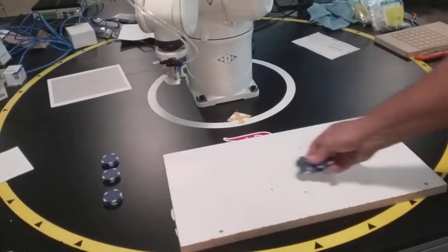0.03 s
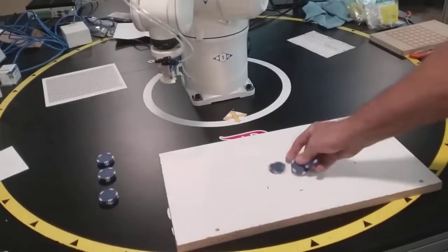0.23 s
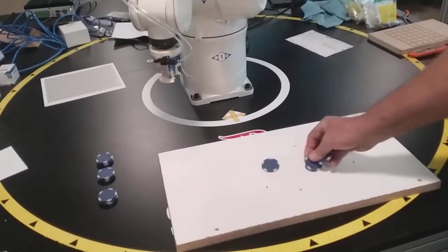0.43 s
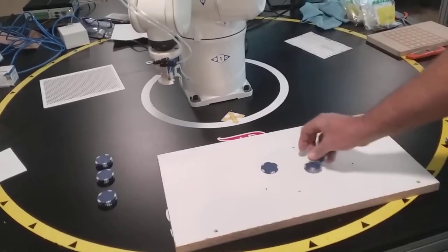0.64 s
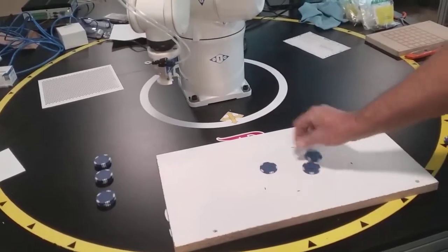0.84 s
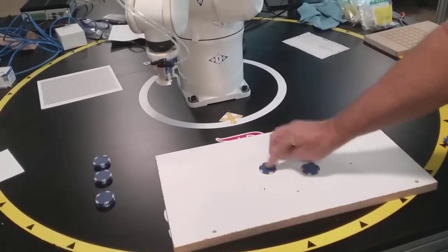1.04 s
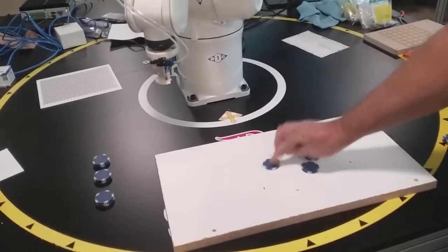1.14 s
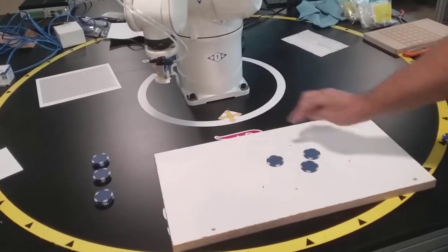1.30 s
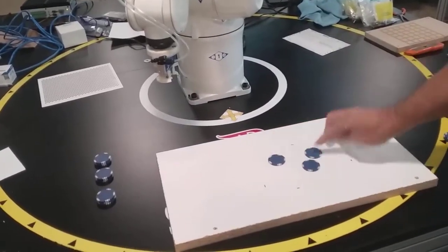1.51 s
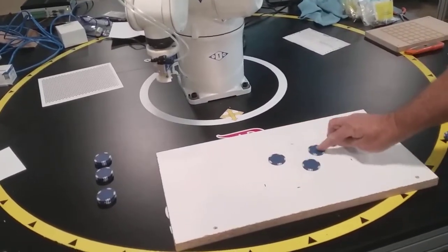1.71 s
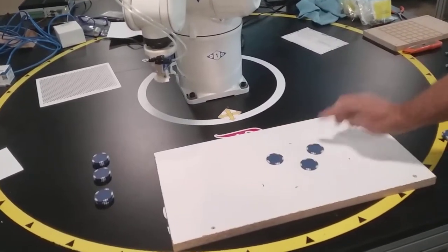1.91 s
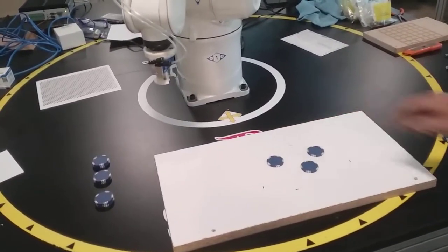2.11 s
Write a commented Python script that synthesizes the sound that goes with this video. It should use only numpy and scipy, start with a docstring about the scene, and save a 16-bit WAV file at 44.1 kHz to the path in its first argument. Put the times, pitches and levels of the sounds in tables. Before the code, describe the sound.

Poker chips click and chatter against each other and a board, ringing briefly, then thin out to a faint tap and scuff. The small room carries short echoes and a steady low ventilation noise.

```python
"""A low ventilation rumble, then a hand sets plastic poker chips on a board and nudges one into place.
Each knock is a short chatter of contacts: the board answers low, the chips clack high and ring briefly.
Sliding chips scuff in tiny slips. A small room carries the tails."""
import sys
import numpy as np
from scipy import signal
from scipy.fft import rfft, irfft
from scipy.io import wavfile
from scipy.ndimage import uniform_filter1d

SR = 44100
rng = np.random.default_rng(int(sys.argv[2]) if len(sys.argv) > 2 else 0)


def put_to_file(sound):
    """Save the sound as 16-bit audio at rate SR, in the file named by the first command-line argument."""
    columns = np.atleast_2d(sound).T  # one column per channel
    safe = np.clip(columns, -1, 1)
    whole_steps = np.round(safe * 32767)
    wavfile.write(sys.argv[1], SR, whole_steps.astype(np.int16))


N = 94815


def amp(db):
    return 10 ** (np.asarray(db) / 20)


def unit_rms(x):
    return x / np.sqrt(np.mean(x ** 2) + 1e-20)


def curve(points, hz):
    """Interpolates on a log-frequency axis."""
    f, value = np.transpose(points)
    return np.interp(np.log(hz + 1), np.log(f + 1), value)


def add(mix, start_s, sound):
    part = mix[:, max(round(start_s * SR), 0):][:, :sound.shape[1]]
    part += sound[:, :part.shape[1]]


def min_phase(db):
    """Causal response for a one-sided dB spectrum."""
    log_gain = np.log(amp(np.maximum(db, -100)))
    mirrored = np.concatenate([log_gain, log_gain[..., -2:0:-1]], -1)
    return np.exp(np.conj(signal.hilbert(mirrored)))[..., :log_gain.shape[-1]]


def stereo_pair(left, other, correlation):
    """Blends two noise spectrograms into partly alike channels."""
    same = correlation[:, None]
    return np.array([left, same * left + np.sqrt(1 - same ** 2) * other])


def echoes(t60_s, delay_s, size=8192):
    """Dense decaying stereo reflections of energy 1."""
    t = np.arange(size) / SR
    tail = rng.standard_normal((2, size)) * amp(-60 * t / t60_s) * (t >= delay_s)
    return tail / np.linalg.norm(tail, axis=1, keepdims=True)


# Each row: frequency in Hz, relative density in dB.
VENT_SPECTRUM = [(15, -59), (25, -39), (64, -4.5), (84, -5), (108, -1), (175, -11), (217, -6), (263, -20.5),
                 (309, -4), (354, -22), (384, -8.5), (463, -21.5), (503, -5), (545, -22.5), (591, -11),
                 (911, -13), (988, -11.5), (1070, -14.5), (1650, -8.5), (2690, -11.5), (3340, -16),
                 (6050, -31.5), (16000, -34.5)]
# Each row: frequency in Hz, left-right correlation.
VENT_CORRELATION = [(50, 1), (150, 0.95), (350, 0.89), (800, 0.52), (2000, 0.04), (15000, 0.076)]
# Each row: time in seconds, mid-band lift in dB.
VENT_MID_LIFT = [(0, -1), (.22, 3), (.8, 10.5), (1.5, 5.5), (2.15, 6)]


def ventilation(rms_db=-50.5, mid_hz=1900, mid_octaves=2.77, hop=1024):
    """Rumble, nearly mono in the bass, and hiss whose mids swell and ease."""
    frames, hz = N // hop + 5, np.fft.rfftfreq(4 * hop, 1 / SR)
    a, b, c, d = rng.standard_normal((frames, len(hz), 4)).T
    noise = stereo_pair(a + 1j * b, c + 1j * d, curve(VENT_CORRELATION, hz))
    mids = np.exp(-.5 * (np.log2((hz + 1) / mid_hz) / mid_octaves) ** 2)
    lift_db = np.interp(np.arange(frames) * hop / SR, *np.transpose(VENT_MID_LIFT))
    noise *= amp(curve(VENT_SPECTRUM, hz)[:, None] + mids[:, None] * lift_db)
    sound = signal.istft(noise, nperseg=4 * hop, noverlap=3 * hop)[1]
    return amp(rms_db) * unit_rms(sound[:, :N])


GRAZE_S = 0.0065  # lead-in before a chip lands


def chatter(length_s, size, graze_count=9, gap_s=0.0009, landing_db=-6):
    """A chip grazes with growing force, lands and chatters on its rim; the shortest knocks click once."""
    clicks = np.zeros(size)
    grazes, contacts = rng.random((graze_count, 3)), rng.random((30, 3))
    clicks[round(GRAZE_S * SR)] = 1
    if length_s > 1.5 * gap_s:
        clicks *= amp(landing_db)
        for k, (jitter, force, side) in enumerate(grazes):
            progress = (k + jitter) / graze_count
            strength = amp(-27.25 + 5.5 * progress) * (.5 + force)
            clicks[round(progress * GRAZE_S * SR)] += strength * np.sign(side - .5)
        for k, (jitter, force, side) in enumerate(contacts[:int(length_s / gap_s)]):
            after_s = (k + .5 + jitter) * gap_s
            strength = amp(5 * (force - .75) - 3 * after_s / length_s)
            clicks[round((GRAZE_S + after_s) * SR)] += strength * np.sign(side - .5)
    return clicks


def board_scatter(t60_s=0.015, correlation=0.63, left_lag_samples=2):
    """A contact spreads through the board, partly alike on both sides."""
    common = echoes(t60_s, 0.0003, size=1024)[0]
    separate = echoes(t60_s, 0.00027, size=1024)
    path = np.sqrt(correlation) * common + np.sqrt(1 - correlation) * separate
    path[:, 0] += 1
    return np.array([np.roll(path[0], left_lag_samples), path[1]])


def flatten(drive, share=0.7, bins=35):
    """Partly evens a random spectrum so the chips' own colour prevails."""
    power = uniform_filter1d(np.mean(abs(drive) ** 2, 0), bins)
    return drive * min_phase(-share * 10 * np.log10(abs(power) + 1e-9))


# Each row: frequency in Hz, relative density in dB.
CLACK_SPECTRUM = [(180, -49.5), (300, -32), (460, -46.5), (593, -15.5), (667, -25), (885, -13.5),
                  (1080, -12.5), (1200, -7.5), (1330, -3.5), (1510, -8.5), (2020, 1), (2340, 1.5),
                  (2520, -2), (2880, 0), (3290, -11), (3520, -4.5), (3950, -5.5), (4300, -11.5),
                  (4700, -7.5), (6200, -17.5), (6830, -13.5), (7320, -22), (8090, -33.5), (8940, -24.5),
                  (10000, -43), (13300, -47.5), (14700, -33.5), (16000, -52)]
# Each row: frequency in Hz, left minus right in dB.
CLACK_BALANCE = [(400, -4), (1320, 2), (2060, 0.5), (2560, 1), (3200, 11.5), (3990, 3.5), (4970, 12.5),
                 (6200, 10), (7730, -5), (9640, -13.5), (12000, -19.5), (15000, -4)]


def clack_db(hz):
    """Stereo spectrum of a chip striking the board."""
    return curve(CLACK_SPECTRUM, hz) + np.array([[.5], [-.5]]) * curve(CLACK_BALANCE, hz)


def damped_modes(modes, t):
    return np.array([amp(db - 60 * t / t60_s) * np.exp(2j * np.pi * hz * t)
                     for hz, db, t60_s, *_ in modes])


# Each row: frequency in Hz, relative level in dB, T60 in seconds, left minus right in dB.
CHIP_MODES = [(3950, -13, 0.11, 6), (3980, -7, 0.095, -3), (4680, -10, 0.05, 15), (4980, -11.5, 0.06, 17),
              (6660, -3.5, 0.057, 8), (6755, 4.5, 0.059, 0.5), (8850, -13, 0.04, -9),
              (14150, -27, .03, -11), (15160, -15, 0.036, -4)]


def chip_ring(t, gain_db=7.5):
    """A struck chip's high modes, in random phase on each side."""
    sides = amp(np.outer([.5, -.5], [mode[3] for mode in CHIP_MODES]))
    phases = np.exp(2j * np.pi * rng.random(sides.shape))
    return amp(gain_db) * (sides * phases @ damped_modes(CHIP_MODES, t)).real


# Each row: frequency in Hz, relative level in dB, T60 in seconds.
BOARD_MODES = [(602, -17, 0.057), (894, -15.5, 0.2), (1204, -11, 0.038), (1355, 6, 0.024), (1606, -5, 0.11),
               (2218, 2, 0.074), (2346, -0.5, 0.13), (2693, -5, 0.06), (2926, 6, 0.04)]


def board_ring(t, gain_db=-15, spread_cycles=0.29):
    """The board's lower modes, close in phase on both sides."""
    count = len(BOARD_MODES)
    cycles = rng.random(count) + spread_cycles * rng.random((2, count))
    return amp(gain_db) * (np.exp(2j * np.pi * cycles) @ damped_modes(BOARD_MODES, t)).real


# Fingers pinch the stack until the first chip is let go. Each row: frequency in Hz, gain in dB.
PINCH_EQ = [(3000, -2), (3750, -1), (4250, -17), (4700, -18), (5400, -6), (6500, -0.5), (6900, -14),
            (8000, -9)]
# Each row: landing in seconds, clack level in dB, thud and bright edge in dB re clack, chatter in seconds,
# chip ring drive in dB re clack, note the contact point favours in Hz, half that note's lift in dB.
KNOCKS = [(0.2397, -24.5, -5, -5, 0.00086, -34, 3820, 2.5), (0.2657, -28.5, -5, -12, 0.001, -43, 2700, 1.5),
          (0.276, -33, -9, -8, 0.001, -39, 2700, 1), (0.295, -42, 0, -14, 0.001, -43, 2860, 3),
          (0.3103, -40.5, 3, -17, 0.001, -34, 2970, 6), (0.334, -22, -7.5, -2.5, 0.0029, -17.5, 2470, 1),
          (0.4294, -18.5, -8, 0.5, 0.0031, -37, 2720, 3.5), (0.435, -40, 1, 12, 0.001, -16, 5040, 21),
          (0.448, -46, 4, 10, 0.001, -22, 4950, -1), (0.46, -40.5, 0, -6, 0.001, -21, 2880, 0),
          (0.506, -22, -5.5, -1.5, 0.001, -26, 3000, 6.5), (0.5247, -36.5, -22, 3, 0.001, -20, 2880, -3),
          (0.54, -37, -16, -17, 0.0014, -39, 2880, 2), (0.567, -22.5, -1.5, -2, 0.0037, -27, 3110, 4.5),
          (0.588, -23, -6.5, -3.5, 0.0016, -35, 2120, 3), (0.622, -22.5, -9, -3.5, 0.0026, -20, 2730, 5),
          (0.6668, -24, -8, -8, 0.0024, -29, 2713, 3), (0.685, -24.5, -8, -2, 0.0036, -18.5, 2010, 7.5),
          (0.7027, -26, -4.5, -6, 0.0059, -24, 3220, 7), (0.719, -33, -7, -6, 0.0011, -27, 2960, 4),
          (0.737, -27.5, -10, -7, 0.0067, -28, 2906, 5), (0.754, -35.5, -5, -11, 0.0013, -24, 2980, 7),
          (0.7663, -23.5, -5.5, -12, 0.0015, -37, 2760, 2), (0.7699, -20, -6.5, -5.5, 0.0071, -35, 2730, 7),
          (0.7777, -32, -16, -30, 0.001, -44, 2370, 3), (0.785, -28, -2.5, -23, 0.001, -29, 2300, -1),
          (0.8421, -17.5, -9.5, -10.5, 0.00039, -18.5, 2900, 5.5),
          (0.8497, -20, -1.5, -5, 0.001, -11.5, 2690, 11), (0.853, -22, -8, 3.5, 0.0065, -10, 6920, 9),
          (0.8855, -35.5, -19, -17, 0.0014, -36, 2368, 10), (0.9, -26.5, 1, -1, 0.001, -27, 2450, 6),
          (0.9022, -20.5, -19, 0.5, 0.006, -5, 2360, 1.5), (0.923, -27.5, 1, 4, 0.0042, -18, 1370, 5.5),
          (0.9535, -23.5, -17, -10, 0.0038, -32, 2470, 8.5),
          (0.9974, -33.5, -1.5, -6, 0.001, -20, 2860, 13),
          (1.0054, -23.5, -3, -5, 0.0037, -11.5, 2900, 4.5),
          (1.0372, -28.5, -3.5, -2, 0.0081, -25, 2400, 5), (1.0702, -32, -0.5, -22, 0.0048, -21, 2920, 3),
          (1.0783, -28, -2, -1.5, 0.0028, -35, 2720, 5.5), (1.099, -32.5, -12, -26, 0.001, -39, 2350, 4),
          (1.1125, -38.5, -14, -7, 0.0057, -30, 2950, 0), (1.1437, -29, -2, -3, 0.0038, -33, 2180, 1),
          (1.2046, -29, -0.5, -3.5, 0.0075, -15, 1313, 0.5), (1.264, -24, -3, -1, 0.0038, -14, 2910, 6.5),
          (1.308, -32, -0.5, -0.5, 0.0089, -12, 2890, 4), (1.357, -27, -4.5, -3.5, 0.0023, -20, 2200, 1),
          (1.389, -26, -4.5, -4, 0.0066, -14, 3000, 5), (1.4165, -29, -9, -3, 0.0047, -15.5, 2930, 5),
          (1.4405, -37, -4, -2.5, 0.0024, -36, 2880, -3), (1.452, -42, -7, -12, 0.001, -43, 2900, -2),
          (1.7525, -45, -25, -32, 0.0017, -53.5, 2920, 7), (1.781, -52, -10, -13, 0.0063, -40, 4620, 9.5)]


def knocks(size=4096, let_go_s=0.32, note_width_hz=266, level_window_s=0.005, swell_s=0.00077):
    """Each chatter sounds as board thud, clack and bright edge, and sets chip and board ringing."""
    out, hz, t = np.zeros((2, N)), np.fft.rfftfreq(size, 1 / SR), np.arange(size) / SR
    above_foot, above_thud, above_edge, above_snap = (
        1 / (1 + (corner_hz / (hz + 1)) ** 12) for corner_hz in (1060, 1816, 3740, 8300))
    thud = above_foot * (1 - above_thud)
    bands = np.array([thud, (1 - thud) * (1 - above_edge), above_edge])
    for start_s, db, thud_db, edge_db, length_s, ring_db, note_hz, half_lift_db in KNOCKS:
        snap_db = above_snap * 0.14 * (db + edge_db + 27)  # harder knocks have more top
        pinch_db = (start_s < let_go_s) * curve(PINCH_EQ, hz)
        peak = 1 / (1 + (2 * (hz - note_hz) / note_width_hz) ** 2)
        note_db = 20 * np.log10(1 + (amp(half_lift_db) ** 2 - 1) * peak)
        colour_db = clack_db(hz) + snap_db + pinch_db + note_db
        drive = flatten(rfft(chatter(length_s, size)) * rfft(board_scatter(), size))
        band_energy = bands @ np.mean(abs(drive * amp(colour_db)) ** 2, 0) * 2 / size
        target_energy = amp([db + thud_db, db, db + edge_db]) ** 2 * level_window_s * SR
        gain_db = 10 * np.log10((target_energy / band_energy) @ bands)
        add(out, start_s - GRAZE_S, irfft(drive * min_phase(colour_db + gain_db)))
        swell = np.minimum(t / (length_s + swell_s), 1)
        add(out, start_s, swell * amp(db) * (amp(ring_db) * chip_ring(t) + board_ring(t)))
    return out


# Each row: frequency in Hz, left-right correlation.
ROOM_CORRELATION = [(150, 0.49), (400, 0.94), (900, 0.42), (2500, 0.1), (6000, 0.13)]
# Each row: frequency in Hz, T60 in seconds.
ROOM_T60 = [(300, 0.31), (1300, 0.19), (3000, 0.37), (6000, 0.18), (15000, 0.17)]
# Each row: frequency in Hz, tail gain in dB.
ROOM_EQ = [(300, 14.5), (1500, 5.5), (3000, -5), (5000, 1), (6500, -1.5), (8000, -7.5), (15000, 2)]


def room(dry, size=14000, tail_db=-8.5, early_db=-14, early_t60_s=0.041, first_echo_s=0.0038):
    """Early echoes off the table and gear, then a short tail."""
    hz, t, noise = signal.stft(rng.standard_normal((2, size)), SR, nperseg=256)
    noise = stereo_pair(*noise, curve(ROOM_CORRELATION, hz))
    decay = amp(-60 * t / curve(ROOM_T60, hz)[:, None])
    decay *= amp(curve(ROOM_EQ, hz))[:, None] / np.sqrt(np.mean(decay ** 2, 1, keepdims=True) * size)
    tail = amp(tail_db) * signal.istft(noise * decay, SR, nperseg=256)[1]
    tail *= np.clip(np.arange(tail.shape[1]) / SR / first_echo_s - 1, 0, 1)
    add(tail, 0, amp(early_db) * echoes(early_t60_s, first_echo_s))
    return signal.fftconvolve(dry, tail, axes=1)[:, :N]


def smooth_room(dry, tails=4, cycle_s=0.27):
    """Several room tails crossfade at constant power, so the reverberation has no fixed ringing pitch."""
    cycles = np.arange(N) / SR / cycle_s
    feeds = np.array([np.maximum(np.cos(2 * np.pi * (cycles - k / tails)), 0) for k in range(tails)])
    feeds /= np.linalg.norm(feeds, axis=0)
    return sum(room(dry * feed) for feed in feeds)


# Each row: frequency in Hz, gain on the clack spectrum in dB.
SLIDE_EQ = [(600, -3.5), (1400, -5), (2200, 1), (2900, 1), (3500, -1.5), (4300, -7), (4700, -3.5),
            (5300, -16), (6000, -4.5), (9000, -5), (15000, -27)]
# Each row: start in seconds, length in seconds, level in dB.
SLIDES = [(0.494, 0.012, -40), (0.782, 0.068, -36), (0.834, 0.003, -27), (1.084, 0.037, -38.5),
          (1.275, 0.161, -43), (1.651, 0.01, -44), (1.726, 0.075, -44)]


def slides(size=16384, slip_spread_db=3, slips_per_s=2500, rise_share=0.39, stop_s=0.0086):
    """A sliding chip gathers speed, then stops short; its tiny slips excite a duller clack."""
    out, hz, t = np.zeros((2, N)), np.fft.rfftfreq(size, 1 / SR), np.arange(size) / SR
    colour = min_phase(clack_db(hz) + curve(SLIDE_EQ, hz))
    for start_s, length_s, db in SLIDES:
        slips = rng.standard_normal(size) * amp(slip_spread_db * rng.exponential(1, size).clip(0, 3))
        slips *= rng.random(size) < slips_per_s / SR
        slips *= np.clip(t / (rise_share * length_s), 0, 1) * np.clip((length_s - t) / stop_s + .5, 0, 1)
        scuff = irfft(rfft(slips) * colour * rfft(board_scatter(), size))
        add(out, start_s, amp(db) * unit_rms(scuff) * np.sqrt(length_s * SR / size))
    return out


def scene():
    """Chips on the board in a ventilated room."""
    chips = knocks() + slides()
    return chips + smooth_room(chips) + ventilation()


def record(dry, cutoff_hz=15900):
    """Steep low-pass band limit."""
    lowpass = signal.firwin(511, cutoff_hz, window=("kaiser", 9), fs=SR)
    return signal.oaconvolve(dry, lowpass[None], "same")


dry = scene()
out = record(dry)
put_to_file(out)
```